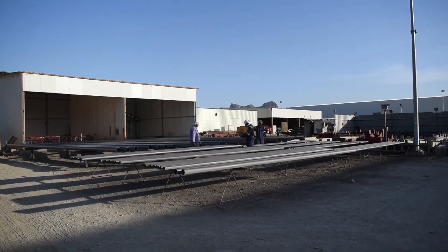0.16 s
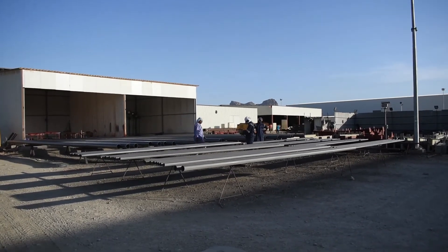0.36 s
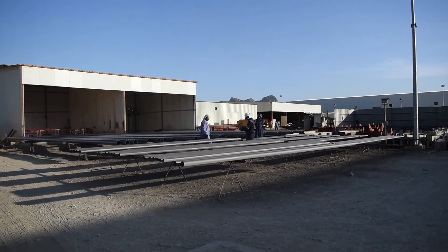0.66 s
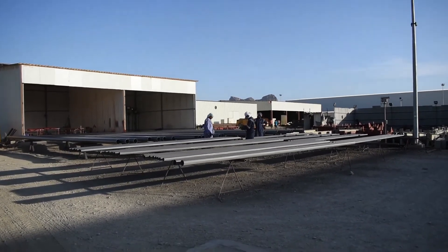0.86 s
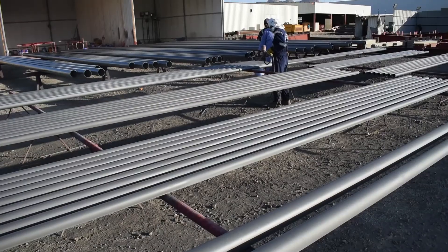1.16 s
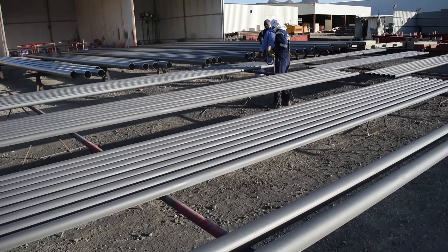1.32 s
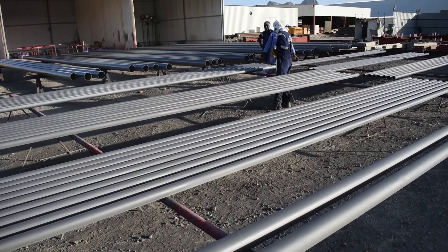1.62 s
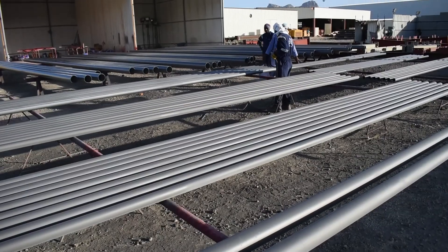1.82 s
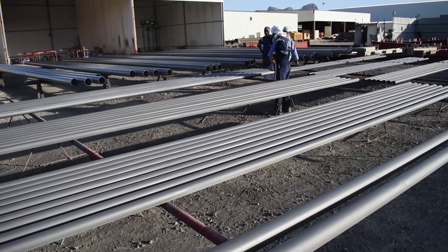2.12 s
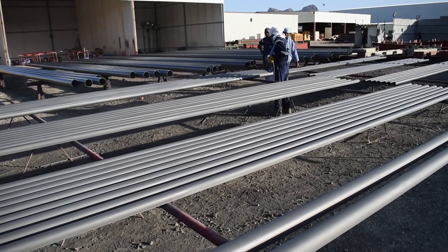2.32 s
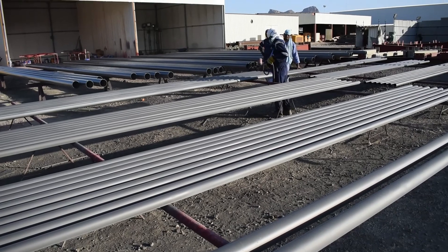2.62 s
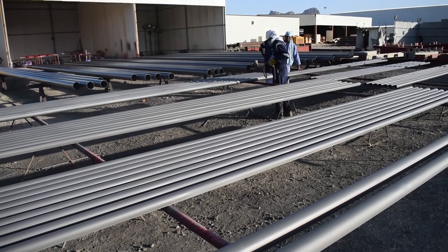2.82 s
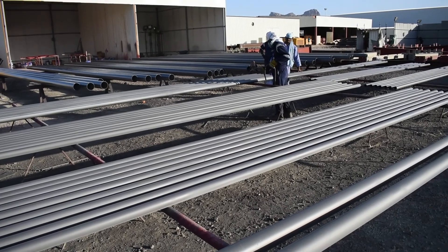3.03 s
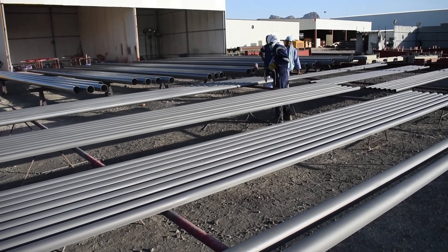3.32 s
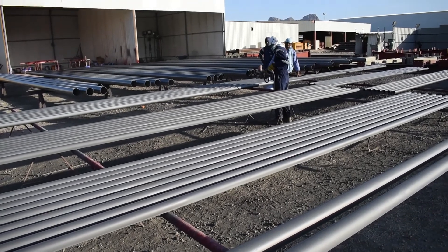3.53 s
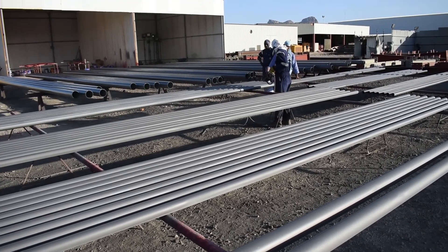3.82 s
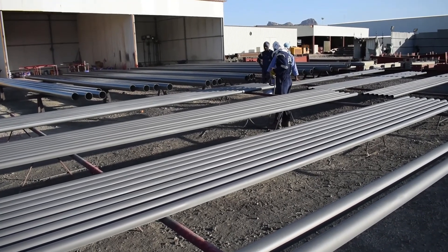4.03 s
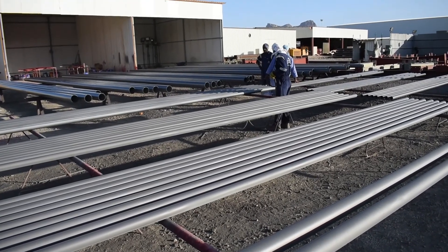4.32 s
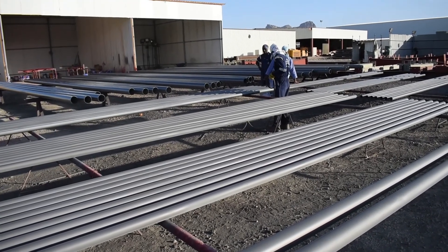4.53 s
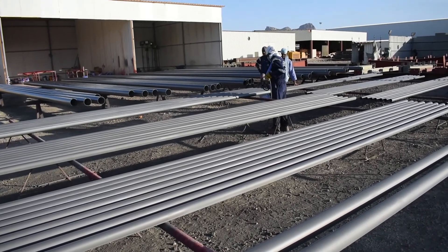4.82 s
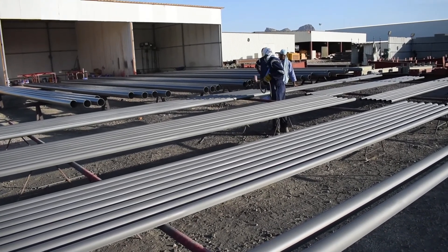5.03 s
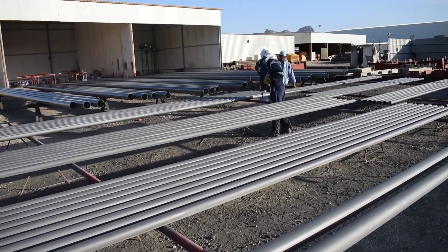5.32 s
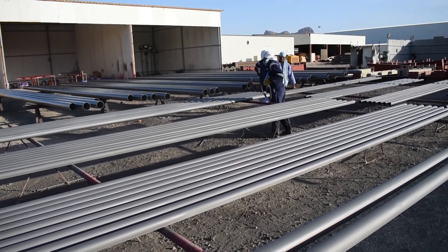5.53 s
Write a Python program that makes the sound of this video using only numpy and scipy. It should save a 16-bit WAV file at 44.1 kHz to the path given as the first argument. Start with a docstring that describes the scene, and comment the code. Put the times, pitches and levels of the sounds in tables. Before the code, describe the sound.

A faint engine drones across an outdoor yard, with soft background noise and a few distant knocks. This cuts off, and a loud, close spray gun takes over, hissing steadily onto steel pipes with a thin whistle and fizzing mist. Twice the bright hiss turns duller and then recovers, the second time with a small puff of air. Brief glassy rings flicker through the noise, and the sound is the same in both ears.

```python
"""First you hear an open yard from afar: a soft rush of noise, a droning engine and a few knocks.
After a short silence a hose-fed gun hisses close by, as a worker sprays steel pipes.
Air rushes, the pipes resonate under the spray, the nozzle hisses and whistles, and mist fizzes.
Twice the gun swings away and back, and the hiss dulls while the worker's body hides the nozzle.
Now and then the noise thins for an instant to a glassy ring. Both ears hear the same."""
import sys
import numpy as np
from scipy import signal
from scipy.fft import rfft, irfft
from scipy.io import wavfile
from scipy.ndimage import uniform_filter1d, map_coordinates

SR = 44100
rng = np.random.default_rng(int(sys.argv[2]) if len(sys.argv) > 2 else 0)


def wrap_up_sound(samples):
    """Save the sound to the file named by the first command line argument, as 16-bit audio."""
    columns = np.atleast_2d(samples).T
    # keep every value between -1 and 1, then stretch to whole-number steps
    tamed = np.clip(columns, -1, 1)
    steps = np.round(tamed * 32767).astype(np.int16)
    wavfile.write(sys.argv[1], SR, steps)


N = 249606
T = np.arange(N) / SR

# Levels in the tables are relative: the mix sets the final loudness.
# The yard from afar, with the gun a faint hiss on top: frequency_hz, level_db
YARD_SPECTRUM = [(20, -34), (70, -16), (150, -4.5), (330, 0), (550, -1), (1200, -1.5), (1900, -4.5),
                 (2250, -9), (2850, -8.5), (3200, -15), (3800, -17), (4700, -13), (8500, -10.5),
                 (10300, -28), (16000, -43)]
# The engine's tones: pitch_hz, far_level_db, near_level_db
ENGINE_TONES = [(154.5, -71, -72), (309.4, -61, -65), (348.5, -58.5, -64.5), (458.5, -66, -77),
                (772, -67, -75), (1226, -68, -78), (2840, -66, -73)]
# Instants when the noise thins to a ring: middle_s, depth_db
RING_MOMENTS = [(.529, 12), (.658, 12), (1.08, 16), (1.275, 14), (1.512, 12), (1.682, 12), (1.722, 14),
                (2.279, 10), (2.317, 13), (2.403, 18), (2.54, 19), (2.745, 19), (2.913, 12), (3.02, 17),
                (3.23, 22), (3.34, 14), (3.43, 14), (4.024, 13), (4.105, 27), (4.282, 13), (4.795, 13),
                (4.835, 13), (4.985, 12), (5.009, 15), (5.132, 15), (5.281, 15), (5.431, 15)]
# Distant knocks: start_s, level_db, pitch_hz, fade_s (time to fall by 60 dB)
DISTANT_KNOCKS = [(.581, -44, 1350, 0.063), (0.597, -40, 1250, 0.045), (0.651, -34, 520, 0.08),
                  (.811, -33.5, 1130, 0.039)]
# Swings of the gun away and back: farthest_s, way_out_s, way_back_s, pipe_echo_lag_ms
GUN_SWINGS = [(2.02, .44, .40, .49), (4.54, .59, .28, 0.548)]
# Rushing air: frequency_hz, level_db
AIR_SPECTRUM = [(20, -34), (50, -27), (110, -11.5), (160, -10), (330, -1.5), (480, -5.5), (740, 3),
                (980, -1.5), (1250, 5), (1620, -12), (2700, -64)]
# Resonances of the pipes under the spray: pitch_hz, width_hz, level_db
PIPE_RESONANCES = [(1432, 150, -8.5), (1753, 305, -5), (2227, 228, -2), (2920, 230, -5.5), (3187, 380, -5),
                   (3993, 1260, -1), (4717, 335, -1), (5270, 830, -4), (5465, 200, -2.5)]
# The nozzle's hiss: frequency_hz, level_db
NOZZLE_SPECTRUM = [(5500, -37), (5900, -4), (6200, 3), (6700, 2.5), (7300, 3), (7700, 3.5), (8200, 2),
                   (8900, -4), (9500, -14), (10500, -35)]
# That hiss starts a little softer, then grows: time_s, level_db
NOZZLE_RISE = [(1.6, -1.7), (2.42, 0)]
# Fizzing mist: frequency_hz, level_db
MIST_SPECTRUM = [(8500, -44), (9500, -0.5), (10400, 3), (11000, -0.5), (11900, -7), (12900, -9.5),
                 (13700, -9.5), (14600, -13.5), (16000, -17)]
# A thin, drifting upper whistle: time_s, pitch_hz, level_db
UPPER_WHISTLE = [(1.0, 9720, -37), (1.45, 9900, -43), (1.8, 10450, -38), (2.3, 9880, -39), (2.7, 9730, -32),
                 (3.3, 9550, -49), (4.3, 9000, -45), (5.15, 8810, -27.5), (5.66, 8920, -47)]


def gain_of(db):
    """Turns decibels into a number to multiply by."""
    return 10 ** (np.asarray(db) / 20)


def evened(x):
    """Scales a signal to an average strength (rms) of 1."""
    return x / np.sqrt(np.mean(x ** 2) + 1e-20)


def colour(spectrum):
    """Turns a spectrum table into a gain for any frequency, silent beyond its ends."""
    points_hz, db = np.transpose(spectrum)
    log_points = np.log(points_hz + 1)
    return lambda hz: gain_of(np.interp(np.log(hz + 1), log_points, db, left=-np.inf, right=-np.inf))


def turbulence(shape, patchy_db, drift_db, size=1024):
    """Shaped noise with quick swirls and narrow bands that drift as echoes shift."""
    hop = size // 4
    real, imag, swirls, drift = rng.standard_normal((4, N // hop + 5, size // 2 + 1))
    # smooth over time (axis 0), then over frequency (axis 1)
    swirls = evened(uniform_filter1d(uniform_filter1d(swirls, size=4, axis=0), size=24, axis=1))
    drift = evened(uniform_filter1d(uniform_filter1d(drift, size=40, axis=0), size=5, axis=1))
    spectra = (real + 1j * imag) * shape(np.fft.rfftfreq(size, 1 / SR))
    spectra *= gain_of(patchy_db * swirls + drift_db * drift)
    return evened(signal.istft(spectra.T, nperseg=size, noverlap=size - hop)[1][:N])


def yard():
    """The soft, steady noise of the open yard from afar."""
    return gain_of(-49.5) * turbulence(colour(YARD_SPECTRUM), patchy_db=0.9, drift_db=0.9, size=2048)


def wander(rate_hz):
    """A smooth random wobble, with up to about rate_hz changes a second."""
    hz = np.fft.rfftfreq(N, 1 / SR)
    return evened(irfft(rfft(rng.standard_normal(N)) / (1 + (hz / rate_hz) ** 4), N))


def engine(near, waver_hz):
    """The engine drones on steady tones that waver a little in pitch and strength."""
    out = np.zeros(N)
    for pitch_hz, far_db, near_db in ENGINE_TONES:
        strength = gain_of((near_db if near else far_db) + 1.9 * wander(9.8))
        phase = 2 * np.pi * np.cumsum(pitch_hz + waver_hz * wander(5.9)) / SR
        out += strength * np.sqrt(2) * np.sin(phase)
    return out


def glassy_rings(x, low_hz=1560, high_hz=9100, sharpness=2.8, ring_db=-2, size=4096):
    """For an instant the noise drops away and only its strongest tones ring on."""
    out, hz = x.copy(), np.fft.rfftfreq(size, 1 / SR)
    offset_s = (np.arange(size) - size // 2) / SR
    band = 1 / (1 + (low_hz / (hz + 1)) ** 12) / (1 + (hz / high_hz) ** 30)
    band *= (hz / high_hz) ** 0.25  # the ring is brighter than the hiss
    for middle_s, depth_db in RING_MOMENTS:
        length_s = 0.008 + 0.0006 * depth_db  # the deeper, the longer
        part = out[round(middle_s * SR) - size // 2:][:size]
        spectrum = rfft(part * np.hanning(size))
        local_level = np.sqrt(uniform_filter1d(abs(spectrum) ** 2, size=90).clip(1e-20))
        # each stretch of the spectrum gathers its energy in a few peaks
        peaks = spectrum / local_level * (abs(spectrum) / local_level) ** sharpness
        peaks /= np.sqrt(uniform_filter1d(abs(peaks) ** 2, size=150).clip(1e-20))
        ring = irfft(peaks * local_level * band, size)
        hiss_level = np.std(irfft(rfft(part) * band))
        ring *= gain_of(ring_db) * hiss_level / np.std(ring[abs(offset_s) < length_s])
        noise_left = gain_of(-depth_db * 0.5 ** ((2 * offset_s / length_s) ** 2))
        part[:] = noise_left * part + np.sqrt(1 - noise_left ** 2) * ring
    return out


def knocks(rise_s=0.0025):
    """Each knock is a short, dull burst of noise around one pitch."""
    out = np.zeros(N)
    for start_s, level_db, pitch_hz, fade_s in DISTANT_KNOCKS:
        age_s = np.maximum(T - start_s, 0)
        band = signal.butter(2, [pitch_hz / 2, pitch_hz * 2], "band", fs=SR, output="sos")
        burst = evened(signal.sosfilt(band, rng.standard_normal(N)))
        envelope = np.exp(-np.log(1000) * age_s / fade_s) * (1 - np.exp(-age_s / rise_s))
        out += gain_of(level_db) * envelope * burst
    return out


def cut_off(end_s, tail_db=-21, fade_s=0.12):
    """A gain that drops at once, leaving a faint, short tail."""
    tail = gain_of(tail_db) * np.exp(-np.log(1000) * np.maximum(T - end_s, 0) / fade_s)
    return np.where(T < end_s, 1, tail)


def fade_in(start_s, length_s):
    """A gain that rises smoothly from 0 to 1."""
    return np.sin(np.pi / 2 * np.clip((T - start_s) / length_s, 0, 1)) ** 2


def swing(farthest_s, out_s, back_s):
    """One smooth turn of the gun and back: 0 is facing the listener, 1 is turned away."""
    return np.exp(-((T - farthest_s) / np.where(T < farthest_s, out_s, back_s)) ** 2)


def hidden(turn, halfway=0.53, softness=0.14):
    """How much the worker's body hides the nozzle, from 0 to 1."""
    return 1 / (1 + np.exp((halfway - turn) / softness))


def swing_gain(turn, base_db, pipes_db, hidden_db):
    """Adds pipes_db as the spray crosses the pipes, and hidden_db as the nozzle is hidden."""
    on_pipes = np.exp(-((turn - 0.34) / 0.32) ** 2)  # greatest a third of the way round
    return gain_of(base_db + pipes_db * on_pipes + hidden_db * hidden(turn))


def air_rush(turn):
    """Air from the gun makes a low rush, louder when turned away."""
    gain = swing_gain(turn, base_db=-46.5, pipes_db=3.5, hidden_db=4.5)
    return gain * turbulence(colour(AIR_SPECTRUM), patchy_db=1.0, drift_db=2.5, size=2048)


def pipe_colour(hz, lowest_hz=330):
    """The pipes' broad resonances add up; they give off almost no bass."""
    power = sum((gain_of(level_db) / (1 + ((hz - pitch_hz) / (0.68 * width_hz)) ** 2)) ** 2
                for pitch_hz, width_hz, level_db in PIPE_RESONANCES)
    return np.sqrt(power) * hz ** 2 / (hz ** 2 + lowest_hz ** 2)


def spray_on_pipes(turn):
    """Spray strikes the steel and stirs its resonances."""
    gain = swing_gain(turn, base_db=-26.5, pipes_db=3, hidden_db=0.78)
    return gain * turbulence(pipe_colour, patchy_db=1.48, drift_db=1.67)


def track(rows, column=1):
    """Joins a table's points in time with straight lines."""
    rows = np.asarray(rows)
    return np.interp(T, rows[:, 0], rows[:, column])


def nozzle_hiss(turn):
    """The jet leaves the nozzle with a loud, bright hiss."""
    gain = swing_gain(turn, base_db=-18.5, pipes_db=-0.3, hidden_db=-4) * gain_of(track(NOZZLE_RISE))
    return gain * turbulence(colour(NOZZLE_SPECTRUM), patchy_db=1.0, drift_db=0.3)


def mist_fizz(turn):
    """The mist fizzes in the highest treble."""
    gain = swing_gain(turn, base_db=-35.5, pipes_db=3, hidden_db=-4.5)
    return gain * turbulence(colour(MIST_SPECTRUM), patchy_db=0.3, drift_db=-2.5)


def whistle(pitch_hz, width_hz):
    """A fuzzy whistle: a narrow band of noise that follows a pitch curve."""
    phase = 2 * np.pi * np.cumsum(pitch_hz) / SR
    return evened(wander(width_hz / 2) * np.cos(phase) + wander(width_hz / 2) * np.sin(phase))


def nozzle_whistles(turn, pitch_hz=6914, rise_hz=227.7):
    """The nozzle's main whistle rises as the gun turns away; a fainter one drifts above it."""
    main = whistle(pitch_hz + rise_hz * turn ** 2, width_hz=690)
    main *= swing_gain(turn, base_db=-20.5, pipes_db=-3.5, hidden_db=-7)
    upper = whistle(track(UPPER_WHISTLE, column=1), width_hz=570)
    upper *= swing_gain(turn, base_db=track(UPPER_WHISTLE, column=2), pipes_db=-2, hidden_db=-4)
    return main + upper


def spray_gun():
    """All the gun's sounds follow its swings; the high ones flutter with the flow."""
    turn = sum(swing(farthest_s, out_s, back_s) for farthest_s, out_s, back_s, _ in GUN_SWINGS)
    low = air_rush(turn) * air_puff() + spray_on_pipes(turn)
    high = nozzle_hiss(turn) + mist_fizz(turn) + nozzle_whistles(turn)
    flutter_db = 0.3 * wander(18) + 0.46 * wander(400)
    return low + high * gain_of(flutter_db)


def delayed(x, lag_ms):
    """The same sound a little later; the lag may change over time."""
    return map_coordinates(x, [(T - lag_ms / 1000) * SR], order=5)


def with_echoes(x, ground_db=-18, pipes_db=-16.5, pipes_top_hz=11500, slide_ms_per_s=0.08):
    """A ground echo colours the hiss; the pipes add a duller one while the nozzle is hidden."""
    out = x + gain_of(ground_db) * delayed(x, lag_ms=1.208)
    hz = np.fft.rfftfreq(N, 1 / SR)
    dull = irfft(rfft(x) / (1 + (hz / pipes_top_hz) ** 10), N)
    for farthest_s, out_s, back_s, lag_ms in GUN_SWINGS:
        # an echo weakens evenly spaced pitches, which slide down as its lag grows
        echo = delayed(dull, lag_ms + slide_ms_per_s * (T - farthest_s))
        out += gain_of(pipes_db) * hidden(swing(farthest_s, out_s, back_s)) * echo
    return out


def air_puff(start_s=4.40, rise_s=0.035, fade_s=0.1, boost_db=8):
    """A gain for one puff near the far end of the second swing: the air swells and sinks back."""
    age_s = np.maximum(T - start_s, 0)
    return gain_of(boost_db * np.minimum(age_s / rise_s, np.exp((rise_s - age_s) / fade_s)))


def scene(far_db=3, near_db=-1.82):
    """The yard from afar, then the gun close by."""
    far = yard() + engine(near=False, waver_hz=3.3)
    far *= gain_of(far_db) * cut_off(end_s=0.899)
    near = with_echoes(spray_gun()) + engine(near=True, waver_hz=2.77)
    near *= gain_of(near_db) * fade_in(start_s=0.956, length_s=0.049)
    mono = glassy_rings(far + near) + knocks()
    return np.tile(mono, (2, 1))


def record(dry, top_hz=15850):
    """Cuts away the treble above top_hz."""
    low_pass = signal.firwin(511, top_hz, window=("kaiser", 9), fs=SR)
    return signal.oaconvolve(dry, low_pass[None], "same")


dry = scene()
out = record(dry)
wrap_up_sound(out)
```